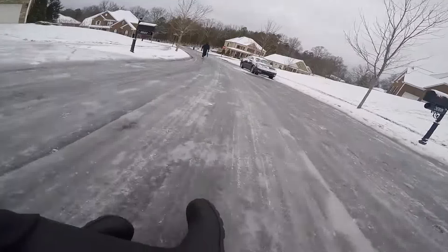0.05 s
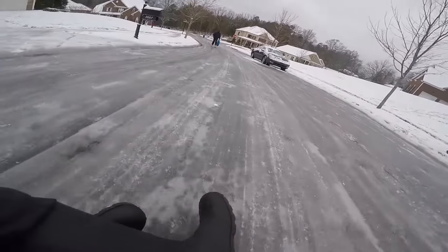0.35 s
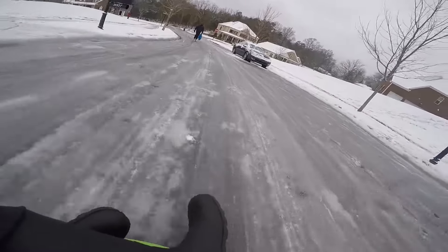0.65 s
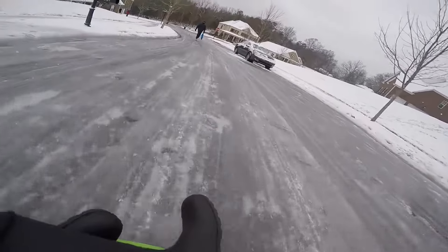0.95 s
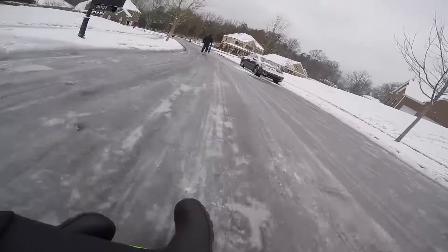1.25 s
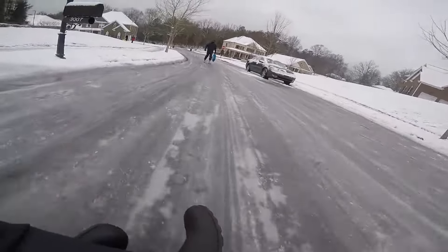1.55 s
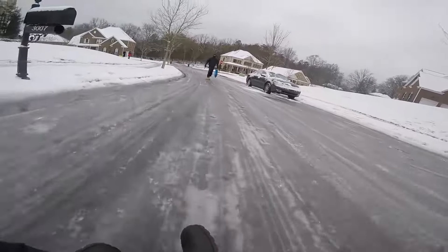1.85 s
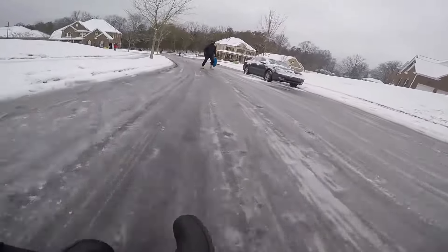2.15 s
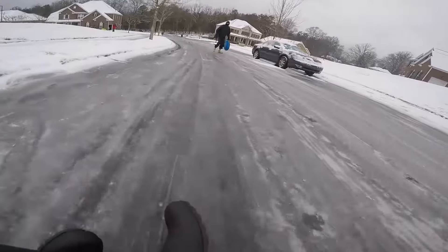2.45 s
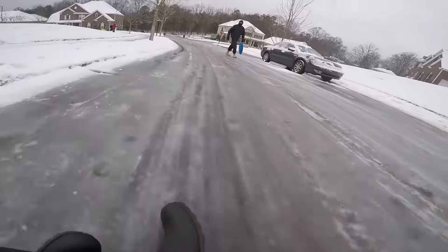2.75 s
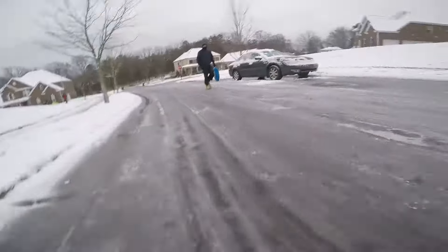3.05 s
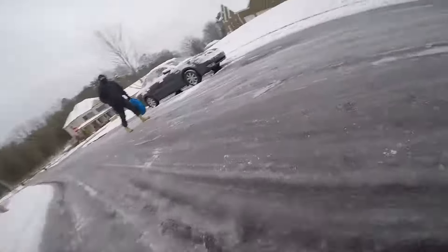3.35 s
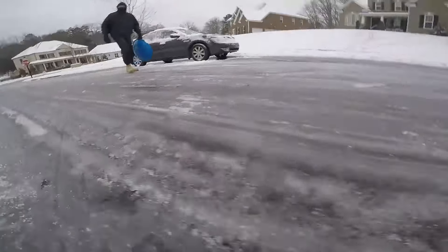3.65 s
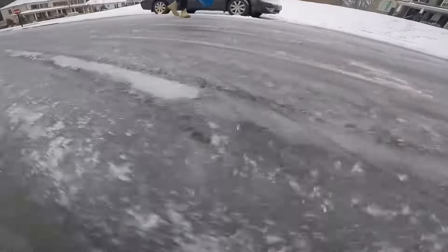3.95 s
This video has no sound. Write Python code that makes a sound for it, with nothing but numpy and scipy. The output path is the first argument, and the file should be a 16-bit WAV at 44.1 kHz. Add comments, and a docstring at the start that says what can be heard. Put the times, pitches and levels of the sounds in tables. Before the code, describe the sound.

A plastic sled scrapes continuously down an icy street, heard from on board. Lumps click against it and ridges give hollow thumps while wind buffets the microphone. Near the end it rasps into a sideways skid.

```python
"""Sled on rough ice

A plastic sled runs down an icy street, heard from on board. Stick-slip friction of ice grains and the
impacts of lumps excite the resonances of its hard shell, the hull drums over ridges, and wind buffets the
microphone. Near the end the sled slews: its edge rasps, and a softer, broadband skid takes over."""
import sys
import numpy as np
from scipy import signal
from scipy.fft import rfft, irfft, next_fast_len
from scipy.io import wavfile
from scipy.ndimage import uniform_filter1d

SR = 44100
rng = np.random.default_rng(int(sys.argv[2]) if len(sys.argv) > 2 else 0)


def store_pcm(level_fs):
    """Save levels as 16-bit WAV."""
    pcm = np.round(np.clip(level_fs, -1, 1) * 32767).astype(np.int16)
    wavfile.write(sys.argv[1], SR, np.atleast_2d(pcm).T)


N = 176400
TIME = np.arange(N) / SR
START_S, ATTACK_S = 0.036, 0.0015


# how hard the hull grinds on the ice: t/s, level/dB
GRINDING = [(0.05,-25), (0.16,-20.5), (0.48,-19), (0.85,-20), (1.08,-22), (1.15,-27), (1.23,-21.5),
            (1.31,-27), (1.41,-21.5), (1.48,-29), (1.58,-26), (1.87,-26.5), (1.95,-20.5), (2.08,-19.5),
            (2.2,-20.5), (2.56,-20.5), (2.62,-18.5), (3.36,-18.5), (3.45,-24), (3.61,-23), (3.66,-30.5),
            (3.715,-36), (3.728,-26), (3.79,-20.5), (3.88,-27), (4.0,-22.5)]
# steady sliding relative to the catching of grains: t/s, level/dB
SLIDING = [(0.4,-3), (0.8,-3), (1.3,-10.5), (2.5,-7.5), (2.75,-2), (4.0,-5)]
def friction(build_s=0.00059, release_s=0.0026):
    """Stick-slip friction: grains catch, load up and crumble, sharing a steady weight between them."""
    rate = 420 * rms_one(level(GRINDING)) ** 1.6   # lighter grinding means fewer catches
    catches = grains(rate, spread_db=3) ** 2 + 1e-12
    power = signal.lfilter([1], [1, -np.exp(-2 / (release_s * SR))], catches)
    power = signal.lfilter([1], [1, -np.exp(-2 / (build_s * SR))], power[::-1])[::-1]
    force = np.sqrt(power / power.mean() + level(SLIDING) ** 2)
    return rms_one(evened(force, seconds=0.078))


# gain of the scrape's treble: t/s, level/dB
TREBLE_GAIN = [(0.1,3.5), (0.5,2), (1.1,2.5), (2.7,-1), (3.3,0), (3.68,8.5), (3.78,4)]
def scrape(force, crossover_hz=2340, grit_hz=4420, treble_hz=4300):
    """Friction noise: the contact force modulates coarse crunch, fine scrape and clicking grit."""
    clicks = grains(per_s=1700, spread_db=0.5) * rng.choice([-1, 1], N)
    grit = force * rms_one(signal.sosfilt(butter(2, grit_hz, "high"), clicks))
    coarse_force = np.sqrt((friction() ** 2 + force ** 2) / 2)   # the crunch half catches on its own
    coarse = signal.sosfilt(butter(2, crossover_hz, "low"), coarse_force * noise())
    fine = signal.sosfilt(butter(2, crossover_hz, "high"), force * noise())
    load = level(GRINDING) * relief(LUMP_HITS, seconds=0.0097)
    rubbing = load * (from_db(-1) * (coarse + fine) + from_db(-11.5) * grit)
    treble = signal.sosfiltfilt(butter(3, treble_hz, "high"), rubbing)
    return rubbing + (level(TREBLE_GAIN) - 1) * treble


# hard lumps that crack against the shell: t/s, level/dB
LUMP_HITS = [(0.078,-1), (0.119,-2.5), (0.16,0.5), (0.189,-4), (0.262,0.5), (0.478,2), (0.57,3.5),
             (0.611,0.5), (1.243,0.5), (1.335,-3.5), (1.345,-3.5), (1.425,-1.5), (1.576,-2), (1.603,-1.5),
             (1.624,-2.5), (1.641,-4.5), (1.673,1), (1.856,-5.5), (1.933,-1), (2.162,1), (2.39,-0.5),
             (2.588,3.5), (3.401,2)]
def lumps():
    """Impact excitation: a brief contact has a broad spectrum."""
    return from_db(-9) * bursts(LUMP_HITS, decay_s=0.0036) * noise()


# broad response of the shell: f/Hz, level/dB
SHELL_SPECTRUM = [(100, -37), (400, -19.5), (720, -24), (1000, -24), (2600, -7), (4200, -19.5),
                  (5200, -22.5), (9000, -33.5), (11300, -36), (15500, -39.5)]
# resonances: f/Hz, width/Hz, level/dB
SHELL_MODES = [(1218, 150, -1), (1640, 490, -5.5), (1833, 267, 1.5), (2150, 190, -13.5), (3170, 286, -0.5),
               (3526, 545, -3), (4920, 210, -21), (5610, 360, -18), (6860, 154, -18), (7600, 800, -21.5),
               (10030, 280, -29.5)]
# anti-resonances: f/Hz, width/Hz, fraction removed
SHELL_NOTCHES = [(2448, 34, 1), (5070, 77, 0.9)]
def shell(excitation):
    """Modal response: the shell radiates strongly at its resonances, weakly at its anti-resonances."""
    sound = colour(excitation, SHELL_SPECTRUM, SHELL_MODES)
    for hz, width, fraction in SHELL_NOTCHES:
        sound = sound - fraction * signal.lfilter(*signal.iirpeak(hz, hz / width, fs=SR), sound)
    return sound


# unevenness of the ice, as strength of drumming: t/s, level/dB
UNEVENNESS = [(0.05,-34.5), (0.25,-30.5), (0.41,-36), (0.5,-30), (1.0,-29), (1.8,-29.5), (1.95,-24.5),
              (2.35,-28.5), (2.75,-24), (3.15,-24.5), (3.33,-29.5), (3.58,-24), (3.7,-41.5), (3.77,-31.5),
              (3.94,-28)]
# response of the hull: f/Hz, level/dB
HULL_SPECTRUM = [(40, 3), (110, -11.5), (160, -6), (230, 0.5), (300, 0.5), (390, -10.5), (650, -23.5),
                 (1200, -28), (4000, -97)]
def hull(force):
    """Forced vibration: the contact force on uneven ice makes the hull drum."""
    load = from_db(2) * level(UNEVENNESS) * relief(RIDGE_HITS, seconds=0.022)
    return colour(load * rms_one(force ** 0.98) * noise(), HULL_SPECTRUM)


# ridges under the hull: t/s, level/dB, ring f/Hz, rattle relative to thump/dB
RIDGE_HITS = [(0.193,-19,257,4.5), (0.449,-17,230,-19), (0.514,-13.5,244,-4), (0.662,-15.5,280,-5),
              (0.897,-21,284,-11), (1.242,-16,241,-1), (1.422,-20.5,333,-9), (1.555,-13,292,-7),
              (1.624,-17.5,177,-4.5), (1.884,-11,302,-11.5), (1.922,-14,283,-10), (2.036,-15,300,-14),
              (2.083,-16,211,-1), (2.138,-15,244,-25), (2.217,-15,299,-19), (2.629,-16,260,-10),
              (2.709,-11.5,304,-17), (2.77,-15.5,277,-7), (2.934,-11,265,-6.5), (3.08,-15.5,264,-8),
              (3.468,-19.5,300,-1.5), (3.508,-14.5,283,-9)]
# thump of a ridge: f/Hz, level/dB
THUMP_SPECTRUM = [(40, -3.5), (130, -8.5), (290, 1.5), (430, -6.5), (700, -14.5), (1100, -13.5),
                  (3000, -55)]
def ridge_thumps(rise_s=0.003, ring_s=0.014):
    """Damped free vibration: each ridge gives the hull a dull thump and a short hollow ring."""
    thud = evened(colour(noise(), THUMP_SPECTRUM), seconds=0.016)
    thumps = from_db(-6.5) * bursts(RIDGE_HITS, decay_s=0.013) * thud
    tones = [(s, db + 1.5, hz) for s, db, hz, _ in RIDGE_HITS]
    rings = swings(tones, lambda age: np.clip(age / rise_s, 0, 1) * np.exp(-np.abs(age) / ring_s))
    return thumps + rings


def ridge_rattle():
    """Impact excitation: each ridge also drives the shell with a burst of noise."""
    blows = [(s, db + rattle_db) for s, db, _, rattle_db in RIDGE_HITS]
    return from_db(3.5) * bursts(blows, decay_s=0.013) * noise()


# the edge digs in as the sled turns: t/s, level/dB
EDGE_LOAD = [(1.9,-58), (2.9,-46), (3.35,-23), (3.46,-26), (3.6,-19.5), (3.67,-32.5), (3.70,-43), (4.0,-34)]
# it bites and lets go: t/s, level/dB
EDGE_BITES = [(3.574,-8.5), (3.649,-13), (3.686,-11.5), (3.715,-15.5)]
# its rasp: f/Hz, level/dB
EDGE_SPECTRUM = [(900, -40), (2400, -13.5), (3000, -0.5), (3400, 3.5), (3850, -3), (4300, -25), (6000, -20),
                 (15000, -81)]
def edge(force):
    """Stick-slip at the hull's edge: a rasp in the turn, with a few hard bites."""
    grip = level(EDGE_LOAD) * force + bursts(EDGE_BITES, decay_s=0.0046)
    return colour(grip * noise(), EDGE_SPECTRUM)


# sideways skid: t/s, level/dB
SIDESLIP = [(0,-56), (3.0,-46), (3.5,-30.5), (3.62,-34), (3.67,-45), (3.717,-44), (3.73,-33.5), (4.0,-31.5)]
# its hiss: f/Hz, level/dB
SKID_SPECTRUM = [(150, -13.5), (480, 11.5), (740, -1.5), (1100, 14.5), (2200, 2), (4500, -15.5),
                 (8000, -20), (12000, -17), (16000, -37)]
def skid(force):
    """Sliding friction: moving sideways, the hull makes a broad, grainy hiss."""
    return colour(from_db(5) * level(SIDESLIP) * force * noise(), SKID_SPECTRUM)


# the hull comes down flat in the skid: t/s, level/dB
LANDING = [(3.86, -15.5)]
# its knock: f/Hz, level/dB
KNOCK_SPECTRUM = [(150, -16), (450, 5.5), (1000, -4), (1800, -3.5), (2500, -7), (6000, -40)]
def knock():
    """Heavily damped impact: the landing hull gives one hollow knock."""
    return colour(bursts(LANDING, decay_s=0.0057) * noise(), KNOCK_SPECTRUM)


# puffs of ice spray: t/s, level/dB
PUFFS = [(3.778,-38), (3.896,-38.5), (3.98,-33)]
# their hiss: f/Hz, level/dB
SPRAY_SPECTRUM = [(2000, -14), (6500, 4), (12500, -3), (16000, -18.5)]
def spray():
    """Incoherent sum: the many particles in a puff of ice merge into a high hiss."""
    return colour(bursts(PUFFS, decay_s=0.023) * noise(), SPRAY_SPECTRUM)


# wind on the microphone: t/s, level/dB
WIND_GUSTS = [(0.05,-44), (0.6,-32), (1.15,-37), (1.55,-19), (1.78,-27), (2.5,-29), (3.3,-26), (3.75,-26.5),
              (4.0,-25.5)]
# single buffets of wind and jolts of the ride: t/s, level/dB
WIND_BUFFETS = [(0.56,-23), (0.82,-11.5), (0.88,-20), (1.37,-18), (1.451,-22), (1.59,-20), (2.28,-23),
                (2.89,-16), (2.98,-18), (3.116,-8), (3.22,-18), (3.351,-14.5), (3.42,-15), (3.569,-17),
                (3.645,-20)]
# rumble: f/Hz, level/dB
WIND_SPECTRUM = [(8, -6), (22, -1), (32, -2), (48, -2), (100, -19), (250, -14), (1500, -70)]
def wind(centre_hz=29.6, buffet_s=0.022):
    """Turbulent pressure: a rumble follows the gusts, and buffets swell and die in a few swings."""
    s, db = np.transpose(WIND_BUFFETS)
    hz = centre_hz * np.exp(0.39 * rng.uniform(-0.93, 1, len(s)))
    buffets = swings(zip(s, db, hz), lambda age: np.exp(-(age / buffet_s) ** 2))
    rumble = evened(colour(noise(), WIND_SPECTRUM), seconds=0.18)
    return buffets + from_db(-8.5) * level(WIND_GUSTS) * rumble


def relief(hits, seconds, dip_db=2):
    """Load sharing: the gain dips around each obstacle while it carries part of the weight."""
    nearness = [np.exp(-((TIME - s) / seconds) ** 2) for s, *_ in hits]
    return from_db(-dip_db * np.max(nearness, axis=0))


def grains(per_s, spread_db):
    """Poisson process: clicks of random size at random moments."""
    return (rng.random(N) < per_s / SR) * from_db(spread_db * np.minimum(rng.exponential(1, N), 3.5))


def bursts(hits, decay_s):
    """Power summation: the envelope of (t/s, level/dB) blows that rise fast and decay exponentially."""
    power = np.zeros(N)
    for s, db, *_ in hits:
        age = np.maximum(TIME - s + ATTACK_S, 0)
        power += (from_db(db) * np.minimum(age / ATTACK_S, 1) * np.exp(-age / decay_s)) ** 2
    return np.sqrt(power)


def swings(rows, envelope):
    """Superposition of sines from (t/s, level/dB, f/Hz) rows, each shaped by envelope(age)."""
    return sum(from_db(db) * envelope(TIME - s) * np.sin(2 * np.pi * hz * (TIME - s))
               for s, db, hz in rows)


def colour(x, spectrum, resonances=()):
    """Minimum-phase filter of unit power gain: a broad spectral density plus resonance peaks."""
    size = next_fast_len(N + 8192)
    size += size % 2
    hz = np.maximum(np.arange(size // 2 + 1) * SR / size, 1)
    point_hz, db = np.transpose(spectrum)
    power = from_db(np.interp(np.log(hz), np.log(point_hz), db)) ** 2
    for centre, width, peak_db in resonances:
        power += from_db(peak_db) ** 2 / (1 + 2 * ((hz - centre) / width) ** 2) ** 2
    cepstrum = irfft(np.log(power / power.mean()) / 2)
    cepstrum[1:size // 2] *= 2   # folding onto positive time makes the filter causal
    cepstrum[size // 2 + 1:] = 0
    return irfft(rfft(x, size) * np.exp(rfft(cepstrum)))[:N]


def butter(order, hz, kind):
    """Maximally flat filter, as second-order sections."""
    return signal.butter(order, hz, kind, fs=SR, output="sos")


def evened(x, seconds):
    """Running normalisation: holds the rms near 1 over the given stretch."""
    return x / np.sqrt(uniform_filter1d(x ** 2, int(seconds * SR)) + 1e-9)


def rms_one(x):
    """Normalisation to rms 1."""
    return x / np.sqrt(np.mean(x ** 2) + 1e-20)


def level(rows):
    """Gain interpolated between (t/s, level/dB) points."""
    return from_db(np.interp(TIME, *np.transpose(rows)))


def from_db(db):
    """Amplitude ratio of a level."""
    return 10 ** (np.asarray(db) / 20)


def noise():
    """White noise."""
    return rng.standard_normal(N)


def scene():
    """Superposition: the sled's sounds and the wind add over a faint noise floor."""
    force = friction()
    ride = shell(scrape(force) + ridge_rattle() + lumps()) + hull(force) + ridge_thumps()
    turn = edge(force) + skid(force) + knock() + spray()
    onset = np.clip((TIME - START_S) / ATTACK_S, 0, 1)
    sound = (ride + turn + wind()) * onset
    floor = from_db(-87) * colour(noise(), WIND_SPECTRUM)
    return (sound + floor)[None]


def record(dry):
    """Soft saturation rounds the peaks, and a steep low-pass limits the bandwidth."""
    ceiling, cutoff_hz = 1.1, 15500
    low_pass = signal.ellip(12, 0.1, 90, cutoff_hz, fs=SR, output="sos")
    return signal.sosfilt(low_pass, ceiling * np.tanh(dry / ceiling))


dry = scene()
out = record(dry)
store_pcm(out)
```